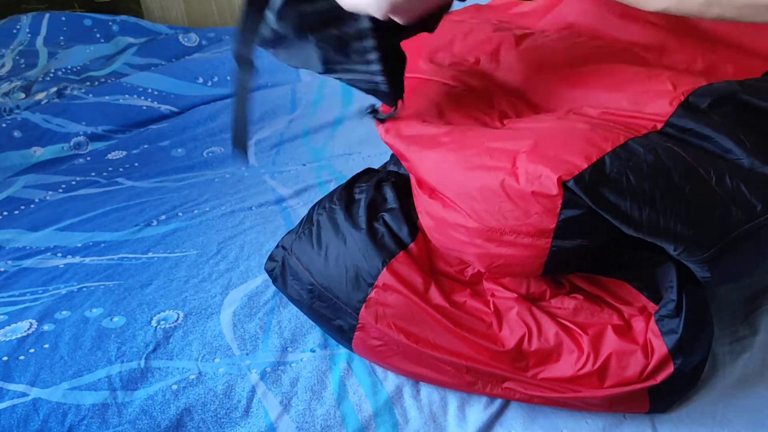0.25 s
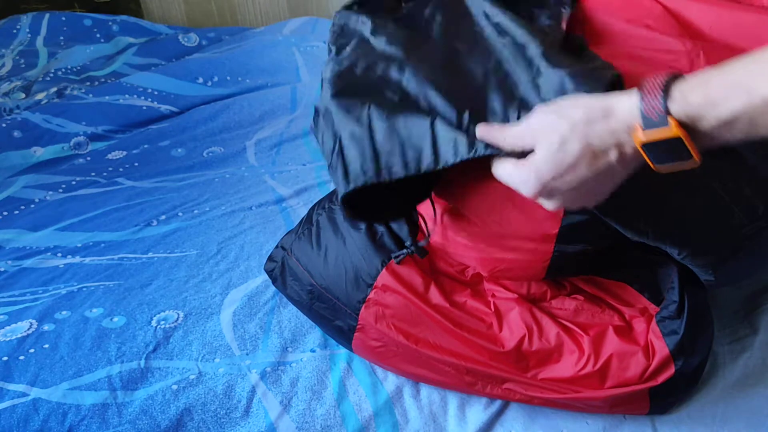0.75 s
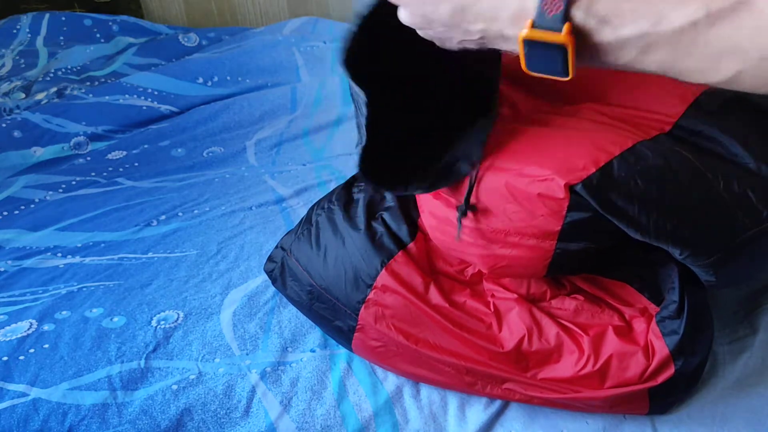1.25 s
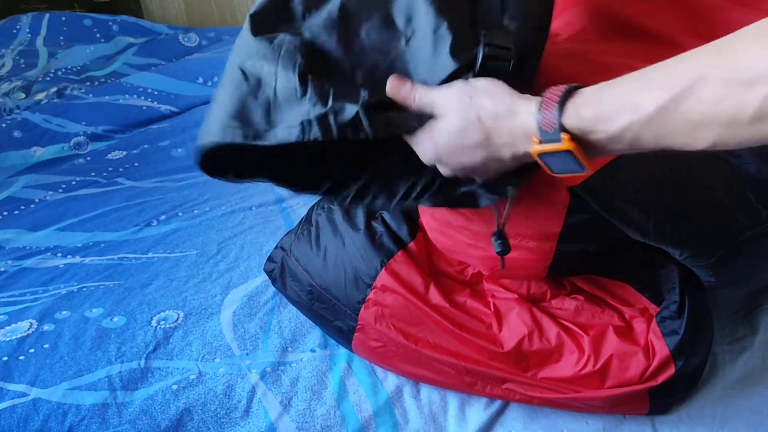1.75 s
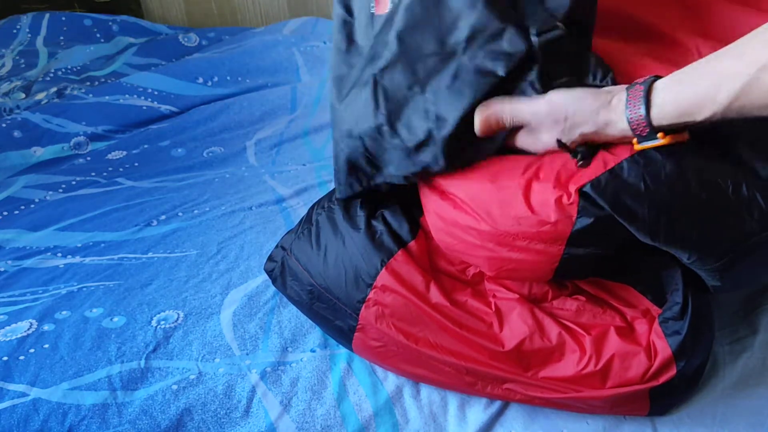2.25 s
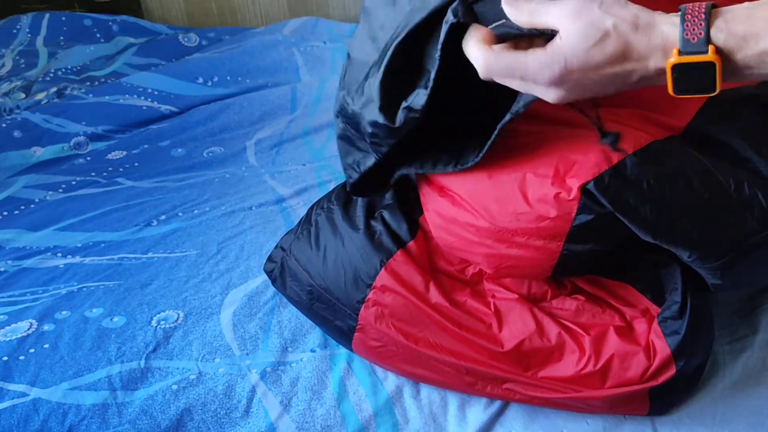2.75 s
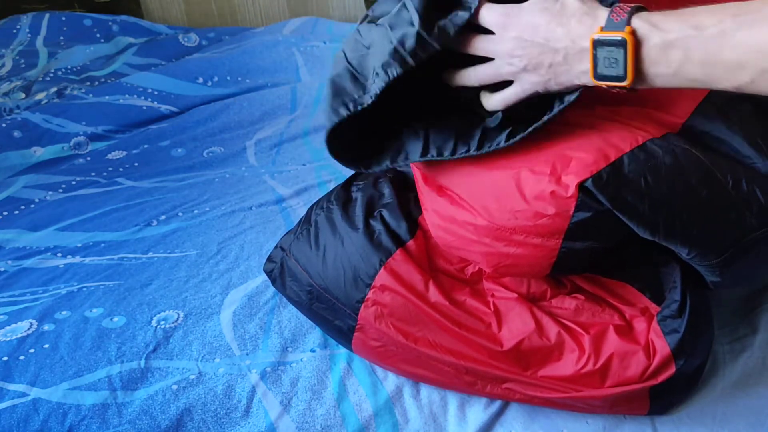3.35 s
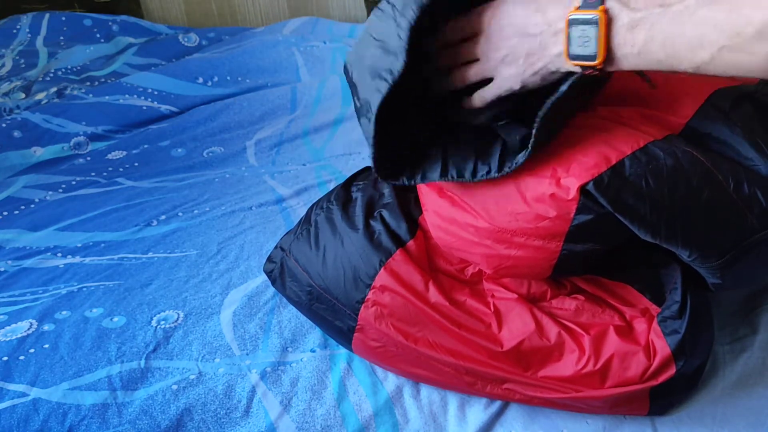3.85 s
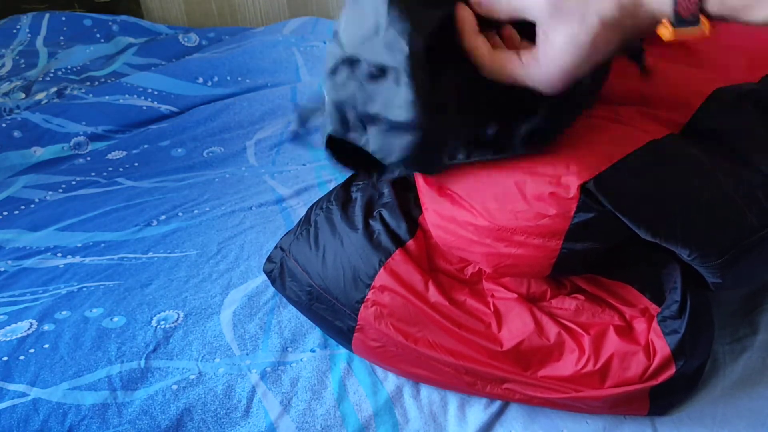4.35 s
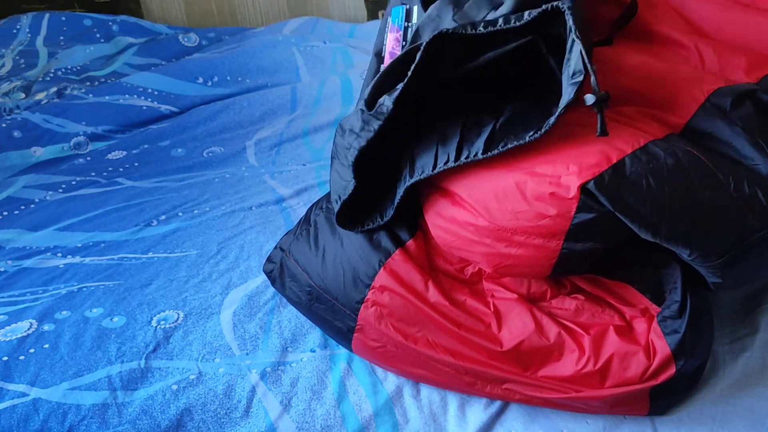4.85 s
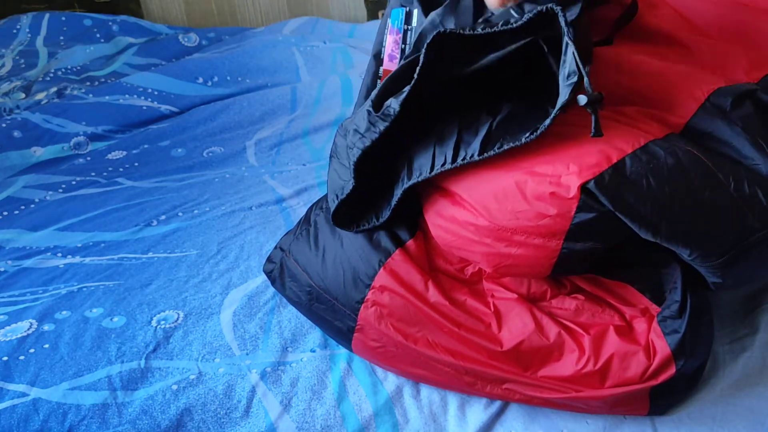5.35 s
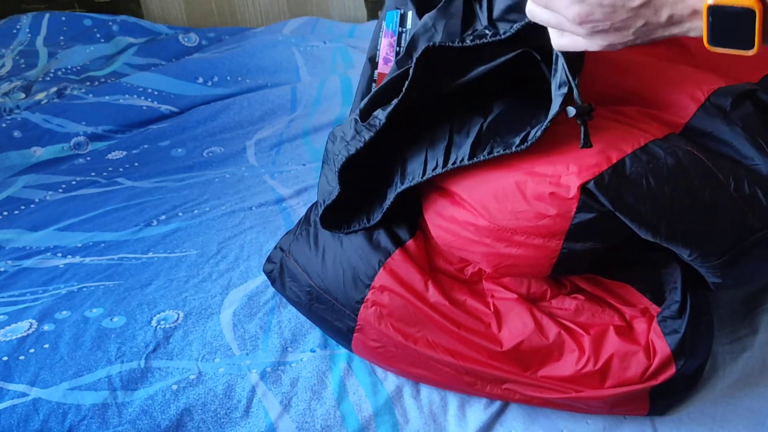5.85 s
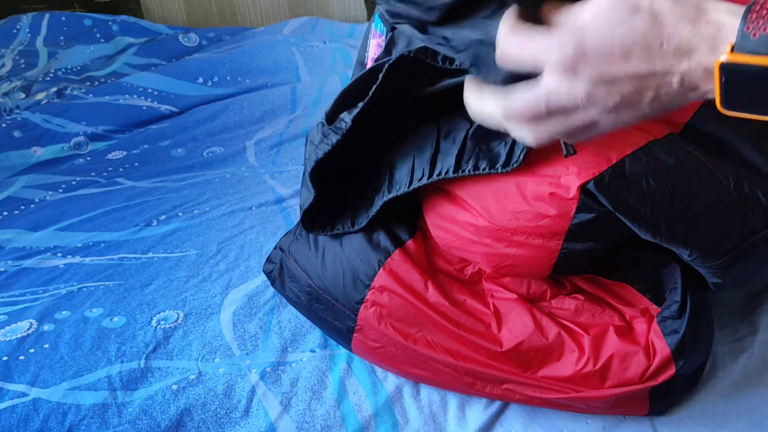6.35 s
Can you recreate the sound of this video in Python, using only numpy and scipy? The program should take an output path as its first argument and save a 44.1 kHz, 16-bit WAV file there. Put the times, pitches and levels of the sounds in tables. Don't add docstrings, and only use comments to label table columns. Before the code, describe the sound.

Slick nylon fabric rustles and crinkles close up in uneven strokes as hands handle a stuff sack, with one sharp little tick and a late pop.

```python
import sys
import numpy as np
from scipy import signal
from scipy.fft import rfft, irfft
from scipy.io import wavfile
from scipy.ndimage import uniform_filter1d

SR = 44100
rng = np.random.default_rng(int(sys.argv[2]) if len(sys.argv) > 2 else 0)


def makeup_ratio(level_db):
    decades = np.asarray(level_db, float) / 20
    return 10 ** decades


def master_out(mix):
    frames = np.transpose(np.atleast_2d(mix))
    ceiling = np.clip(frames, -1, 1)
    pcm = np.round(ceiling * 32767).astype(np.int16)
    wavfile.write(sys.argv[1], SR, pcm)


N = 291060
HZ = np.fft.rfftfreq(N, 1 / SR)


def evened(x):
    return x / np.sqrt(np.mean(x ** 2) + 1e-20)


def read(points, hz):
    f, value = np.transpose(points)
    return np.interp(np.log(hz + 1), np.log(f + 1), value)


def filtered(x, tone):
    return irfft(rfft(x) * makeup_ratio(read(tone, HZ)), N)


def curve(rows):
    s, value = np.transpose(rows)
    return np.interp(np.arange(N) / SR, s, value)


def sides(db):
    return makeup_ratio(np.array([db / 2, -db / 2]))


def add(mix, s, sound):
    part = mix[:, round(s * SR):][:, :sound.shape[1]]
    part += sound[:, :part.shape[1]]


# (frequency [Hz], left-right likeness [0-1])
COHERENCE = [(40, 0.11), (80, 0.26), (150, 0.91), (300, 0.89), (640, 0.75), (1000, 0.47), (1500, 0.61),
             (3100, 0.4), (6000, 0.16), (9000, 0.025), (15000, 0.058)]


def pair(x):
    same = np.clip(read(COHERENCE, HZ), 0, 1)
    a, b = rfft(x)
    return irfft([a, same * a + np.sqrt(1 - same ** 2) * b], N)


def rustle(tone, per_s, spread_db, slip_s, hiss):
    rank = np.minimum(rng.exponential(1, N), 3.5)
    happens = rng.random(N) < per_s / SR
    size = makeup_ratio(spread_db * rank) * happens
    decay = np.exp(-1 / (slip_s * SR))
    slips = signal.lfilter([1], [1, -decay], size ** 2)
    power = slips / slips.mean() + hiss
    return evened(filtered(np.sqrt(power) * rng.standard_normal((2, N)), tone))


def swell(s, db, rise_ms, fall_ms):
    t = np.arange(0, N + 64, 64) / SR
    late_ms = 1000 * (t - s[:, None])
    steps = np.where(late_ms < 0, -late_ms / rise_ms[:, None], late_ms / fall_ms[:, None])
    power = (makeup_ratio(db[:, None] - 10 * steps) ** 2).sum(0)
    return np.interp(np.arange(N) / SR, t, power)


# (peak time [s], effort [dB], rise [ms], fall [ms], weight on the filling [dB])
TURNING_STROKES = [(-0.009, -34, 498, 31, -9), (0.074, -34, 150, 64, -9), (0.2, -54, 23, 20, -1),
                   (0.266, -38.5, 210, 31, -16), (0.477, -38, 150, 110, -14), (0.597, -40.5, 39, 79, -30),
                   (0.684, -41, 220, 22, -10), (0.77, -36, 27, 33, -20), (0.827, -32.5, 77, 49, -11.5),
                   (0.887, -27.5, 146, 40, -16), (1.028, -36, 110, 400, -18.0), (1.097, -50, 39, 23, -14),
                   (1.182, -37, 50, 78, -3.5), (1.346, -46.5, 27, 34, -8), (1.438, -39.5, 108, 460, -16.5),
                   (1.533, -42, 38, 38, -20), (1.755, -30, 29, 9.3, -8.5), (1.819, -24.5, 90, 94, -11.5),
                   (1.995, -41.5, 72, 42, -13), (2.214, -38, 260, 59, -11.5)]
OPENING_STROKES = [(2.401, -45.5, 211, 8.8, -11.5), (2.534, -38.5, 128, 56, -9),
                   (2.638, -37.5, 12, 40, -16.5), (2.752, -44, 92, 93, -10), (2.884, -38.5, 31, 95, -17),
                   (2.945, -40.5, 170, 18, -10.5), (3.049, -36, 39, 45, -27), (3.164, -43, 280, 20.4, -18),
                   (3.257, -32, 72, 25, -22.5), (3.346, -34, 35, 29, -20.5), (3.45, -31, 73, 91, -23),
                   (3.544, -37.5, 190, 14, -14), (3.592, -37, 343, 25, -13), (3.701, -28.5, 55, 40, -15.5),
                   (3.845, -33.5, 85, 123, -16), (3.99, -32, 37, 56, -22), (4.054, -37, 110, 56, -7),
                   (4.167, -29, 46, 24, -21), (4.302, -31, 240, 42, -18), (4.422, -35, 21, 33, -21),
                   (4.456, -38, 310, 38, -17)]
SETTLING_STROKES = [(4.544, -39, 9.4, 92, -19.5), (4.686, -40.5, 79, 52, -9.5), (4.774, -42, 5.1, 92, -13),
                    (4.884, -38, 38, 44, -14), (4.962, -38.5, 9.3, 94, -15), (5.061, -45, 39, 54, -7),
                    (5.102, -28.5, 8.7, 46, -23), (5.272, -43.5, 37, 117, -15.5),
                    (5.333, -42.5, 29, 34, -12), (5.437, -38, 43, 120, -15.5), (5.521, -41, 61, 25, -8),
                    (5.591, -43, 16, 330, -11.5), (5.792, -45.5, 78, 23, -23), (5.878, -45, 250, 120, -11),
                    (6.003, -36.5, 26, 50, -16), (6.074, -29.5, 53, 27, -6.5), (6.243, -44, 130, 96, -16),
                    (6.545, -42, 210, 86, -17.5)]


def strokes(weight_share, layer_db):
    rows = TURNING_STROKES + OPENING_STROKES + SETTLING_STROKES
    s, db, rise_ms, fall_ms, weight_db = np.transpose(rows)
    effort_db = db + weight_share * weight_db + layer_db
    return swell(s, effort_db, np.maximum(rise_ms, 4), np.maximum(fall_ms, 4))


# (time [s], effort [dB], rise and fall [ms])
SQUEEZES = [(0.218, -51.5, 26), (0.482, -47.5, 76), (0.675, -45, 33), (0.789, -42, 29), (1.032, -49.5, 33),
            (1.229, -42, 8.9), (1.438, -43.5, 23), (1.58, -46, 63), (1.656, -44.5, 61), (1.737, -42.5, 42),
            (1.871, -45, 32), (2.244, -50.5, 54), (3.106, -51.5, 43), (3.272, -50.5, 25), (3.365, -61, 33),
            (4.015, -54, 26), (4.294, -49, 19), (4.382, -50, 55), (5.114, -52, 17), (5.275, -55, 14),
            (5.604, -57, 20), (6.283, -60, 40), (6.576, -55, 30)]


def squeezes():
    s, db, length_ms = np.transpose(SQUEEZES)
    return swell(s, db, length_ms, length_ms)


# (frequency [Hz], level [dB])
SLIDE_SPECTRUM = [(1500, -13.5), (3000, -4), (4500, -3), (7000, -2.5), (11000, -2.5), (16000, -5.5)]
# (time [s], left-right difference [dB])
HAND_PLACE = [(0, 1.5), (1.9, 2), (2.3, 2.5), (4.4, 1.5), (5.0, 3), (5.4, 1), (6.2, 1), (6.5, 8.5),
              (6.6, 11)]


def sliding():
    hiss = rustle(SLIDE_SPECTRUM, per_s=590, spread_db=4.0, slip_s=0.013, hiss=0.46)
    power = strokes(weight_share=0, layer_db=-8)
    return pair(hiss * np.sqrt(power)) * sides(curve(HAND_PLACE))


# (frequency [Hz], level [dB])
CRUMPLE_SPECTRUM = [(300, -23), (700, -4), (1100, -2), (1600, -0.5), (2800, -2), (4000, -8.5), (8000, -20),
                    (16000, -40)]
# (time [s], effort [dB], rise and fall [ms])
LONE_FOLDS = [
    (0.68, -52, 25),
    (3.22, -52, 40),
    (3.98, -49, 33),
    (5.0, -50, 15),
    (5.33, -43, 11),
    (5.445, -45, 69),
    (6.27, -54, 25),
]


def crumpling():
    crackle = rustle(CRUMPLE_SPECTRUM, per_s=270, spread_db=3.5, slip_s=0.0033, hiss=1.18)
    s, db, length_ms = np.transpose(LONE_FOLDS)
    power = strokes(weight_share=0.64, layer_db=-0.36) + swell(s, db, length_ms, length_ms)
    power = power + squeezes() * makeup_ratio(-3) ** 2 + makeup_ratio(-74) ** 2
    return pair(crackle * np.sqrt(power))


# (frequency [Hz], level [dB])
PUSH_SPECTRUM = [(60, -44), (105, -14), (150, -6), (215, 2), (330, -3), (520, -2.5), (800, -5.5),
                 (1300, -8), (3000, -56)]


def pushing():
    low = rustle(PUSH_SPECTRUM, per_s=60, spread_db=1.5, slip_s=0.0023, hiss=2.8)
    power = strokes(weight_share=1, layer_db=-1.5)
    power = power + squeezes() * makeup_ratio(1.5) ** 2 + makeup_ratio(-63) ** 2
    return pair(low * np.sqrt(power))


# (time [s], level [dB])
AIR_LEVEL = [(0.0, -61), (0.26, -65), (0.27, -66), (0.79, -59), (0.97, -68), (1.01, -61), (1.62, -60),
             (1.78, -58), (1.91, -62), (5.53, -63), (5.59, -67), (5.7, -64), (5.84, -67), (6.07, -64),
             (6.23, -67), (6.43, -56), (6.56, -58), (6.6, -63)]
# (frequency [Hz], level [dB])
AIR_SPECTRUM = [(14, -3), (28, 1.5), (40, -5.5), (65, -8.5), (100, -12.5), (200, -26), (500, -57)]


def air():
    lumps = rustle(AIR_SPECTRUM, per_s=42, spread_db=-17.0, slip_s=0.058, hiss=2.7)
    return pair(lumps) * makeup_ratio(curve(AIR_LEVEL) + 1.8)


def modes(events):
    out, t = np.zeros((2, N)), np.arange(3000) / SR
    onset = 1 - np.exp(-t / 0.00032)
    for s, db, hz, t60 in events:
        decay = makeup_ratio(db - 60 * t / max(t60, 0.002))
        ring = decay * np.sin(2 * np.pi * hz * t) * onset
        add(out, s + 0.00029, np.array([ring, 0.74 * ring]))
    return out


def brief(events):
    return modes([(s + 0.0008, db, hz, 14.3 / hz) for s, db, hz in events])


# (time [s], peak [dB], pitch [Hz])
FOLD_CRACKS = [(0.031, -18.5, 1460), (0.407, -32.5, 890), (0.763, -28, 961), (0.783, -24.5, 1350),
               (0.826, -22, 1580), (1.027, -34.5, 846), (1.175, -22, 1910), (1.183, -21, 1430),
               (1.336, -30.5, 1140), (1.434, -38, 1480), (1.563, -32, 1130), (1.736, -19.5, 1300),
               (2.136, -33, 1510), (2.439, -35, 1500), (2.929, -26, 3430), (3.328, -25, 3570),
               (3.408, -25.5, 2260), (3.678, -20, 3080), (4.142, -21, 3130), (4.444, -31, 1600),
               (4.95, -31, 2160), (4.864, -37, 2170), (4.981, -41, 970), (5.0, -26, 2600),
               (5.846, -36, 1440), (4.021, -25, 1900), (3.265, -33, 3400), (3.444, -24, 2400),
               (6.546, -39, 1480), (5.267, -43, 754), (5.7, -38, 1690), (5.927, -37.5, 700)]


def cracks():
    return brief(FOLD_CRACKS)


# (time [s], peak [dB], left-right difference [dB], flurry length [s])
CREASE_SNAPS = [(0.059, -35, 1, 0.0031), (0.4553, -37, 0, 0.003), (0.7555, -26.5, 4, 0.0065),
                (1.1495, -26, -3, 0.0019), (1.353, -36, 4.5, 0.0025), (1.716, -29, 17, 0.0028),
                (1.79, -28, 2, 0.002), (1.8103, -22, 7, 0.0026), (1.829, -28, 2, 0.0035),
                (2.929, -38, -3, 0.003), (3.028, -41, 6, 0.0039), (3.3263, -36, 0, 0.003),
                (3.568, -29.5, 7, 0.0036), (3.953, -28, -2, 0.008), (3.974, -29, 23, 0.0028),
                (3.983, -18.5, 1.5, 0.007), (4.4117, -30, 1, 0.0041), (4.453, -35, 3, 0.0034),
                (4.536, -35, 7, 0.003), (4.544, -43, 2, .003), (4.772, -31, -3, 0.0018),
                (4.776, -36, 5, 0.0017), (4.9519, -28, 9, 0.0008), (5.0964, -15, -1, 0.00046),
                (5.1038, -28, -7, 0.0018), (5.186, -29, -1.5, 0.0014), (5.3238, -30.5, 3, 0.0012),
                (5.5915, -29, 1, 0.0042), (5.701, -33, 3, 0.0035), (6.0526, -29, 2, 0.0025),
                (6.0665, -28, -3, 0.0021), (6.542, -35, 1, 0.0024)]
# (frequency [Hz], level [dB])
SNAP_SPECTRUM = [(700, -30), (2000, -9), (3500, -10), (5500, 1.5), (7000, 0), (11000, -6), (16000, -10)]


def snaps():
    out, t = np.zeros((2, N)), np.arange(1500) / SR
    noise = rng.standard_normal((len(CREASE_SNAPS), 2, 1500))
    for (s, db, pan_db, flurry_s), puff in zip(CREASE_SNAPS, noise):
        flurry = 0.62 * puff * np.exp(-t / max(flurry_s, 2e-4))
        tick = flurry + (t == t[20])
        add(out, s + 0.0011, makeup_ratio(db - 5.0) * sides(pan_db)[:, None] * tick)
    return filtered(pair(out) + out, SNAP_SPECTRUM)


# (time [s], peak [dB], pitch [Hz], t60 [s])
PANEL_POPS = [(0.064, -23.5, 790, 0.0087), (0.479, -31.5, 299, 0.012), (0.669, -28, 1470, 0.01),
              (0.799, -28, 1480, 0.012), (1.15, -27.5, 1630, 0.012), (1.189, -28, 384, 0.016),
              (1.223, -34, 248, 0.032), (1.446, -35, 1510, 0.016), (1.757, -23.5, 533, 0.017),
              (1.791, -18.5, 2710, 0.012), (1.857, -26, 1310, 0.013), (2.239, -44, 269, 0.011),
              (3.104, -27.5, 503, 0.0074), (3.236, -39, 940, .04), (3.355, -36.5, 764, 0.049),
              (3.424, -37, 850, .03), (3.698, -29, 2060, 0.015), (3.923, -29, 990, 0.0093),
              (4.279, -37, 680, 0.017), (5.098, -34, 824, 0.029), (5.325, -30, 2300, 0.0096),
              (5.427, -32, 1520, 0.017), (5.597, -24.5, 1740, 0.0066), (5.975, -30, 780, 0.015),
              (6.03, -17, 2540, 0.0062), (6.032, -19.5, 725, 0.013), (6.04, -20.5, 735, 0.017),
              (6.054, -30, 1590, 0.012), (6.059, -3.5, 1540, 0.0051), (6.062, -23.5, 470, 0.028),
              (6.068, -26, 1020, 0.011), (6.259, -33.5, 784, 0.011), (6.566, -35, 414, 0.011)]


def pops():
    return modes(PANEL_POPS)


# (time [s], effort [dB], rise [ms], fall [ms])
TAUT_SWISHES = [
    (0.46, -50, 15, 45),
    (0.6, -47, 28, 50),
    (0.86, -38, 25, 24),
    (3.989, -36.5, 16, 17),
    (6.04, -48, 6, 20),
    (4.55, -56, 8, 25),
    (5.107, -50, 4, 8),
]
# (frequency [Hz], level [dB])
SWISH_SPECTRUM = [(3000, -32), (5000, -15), (6500, -1), (9000, 4), (12000, 4), (16000, -10)]


def swishes():
    fizz = rustle(SWISH_SPECTRUM, per_s=500, spread_db=9.0, slip_s=0.0022, hiss=0.6)
    return pair(fizz * np.sqrt(swell(*np.transpose(TAUT_SWISHES))))


# (time [s], peak [dB], pitch [Hz])
HAND_THUDS = [
    (0.653, -46, 138),
    (1.02, -44, 186),
    (1.173, -43.5, 162),
    (1.57, -44, 166),
    (1.711, -39, 228),
    (3.7, -43, 186),
    (4.377, -41, 225),
    (6.038, -48, 235),
]


def thuds():
    return brief(HAND_THUDS)


# (time [s], peak [dB], pitch [Hz], t60 [s])
LOCK_MODES = [(5.0972, -12.5, 6730, 0.0039), (5.0973, -19, 8940, 0.0027), (5.0974, -23, 3680, 0.0053),
              (5.0972, -12, 14660, .0025), (5.0972, -24, 15600, .003), (5.1037, -29, 7300, .004),
              (5.1062, -27, 7600, .004), (5.108, -30, 7000, 0.0035), (5.0967, -12.5, 5000, 0.0023),
              (5.0971, -8, 10600, 0.0037), (5.097, -35, 2300, 0.003)]


def cord_lock():
    return modes(LOCK_MODES)


# (frequency [Hz], t60 [s])
REVERBERATION = [(200, 0.16), (1000, 0.1), (4000, 0.14), (10000, 0.092)]


def room(x):
    taps = np.zeros((2, SR // 2))
    start = np.arange(120, SR // 2 - 20, 20)
    at = start + rng.integers(0, 20, (2, len(start)))
    np.put_along_axis(taps, at, rng.choice([-1., 1.], at.shape), 1)
    hz, t, z = signal.stft(taps, SR, nperseg=256)
    decay = makeup_ratio(-60 * t / read(REVERBERATION, hz)[:, None])
    tail = signal.istft(z * decay, SR, nperseg=256)[1]
    return signal.fftconvolve(x, tail / np.linalg.norm(tail[0]), axes=1)[:, :N]


def scene():
    soft = sliding() + crumpling() + pushing() + swishes()
    hits = cracks() + snaps() + pops() + thuds() + cord_lock()
    tail = pair(room(makeup_ratio(-5.0) * hits + makeup_ratio(-10.5) * soft))
    return soft + hits + tail + air()


# (frequency [Hz], limit relative to the neighbourhood [dB])
BAND_LIMIT = [(1500, -12), (3200, -1.3), (6400, -.9), (7000, -12), (9200, -12), (9600, -3.5), (10600, -.8),
              (16000, -.3)]


def thinned(x):
    mid_side = [x[0] + x[1], x[0] - x[1]]
    hz, _, z = signal.stft(mid_side, SR, nperseg=2048, noverlap=1536)
    power = uniform_filter1d(abs(z) ** 2, size=2, axis=2)
    band = np.add.reduceat(power, np.arange(0, len(hz), 12), axis=1) / 12
    band = np.repeat(band, 12, axis=1)[:, :len(hz)]
    around = uniform_filter1d(power, size=61, axis=1)
    frame = power.sum((0, 1))
    sudden = frame > uniform_filter1d(frame, size=25) * makeup_ratio(5) ** 2
    kept = (band > around * makeup_ratio(read(BAND_LIMIT, hz))[:, None] ** 2) | sudden
    mid, side = signal.istft(z * kept, SR, nperseg=2048, noverlap=1536)[1][:, :N]
    return np.array([mid + side, mid - side]) / 2


def low_pass(x):
    return signal.sosfilt(signal.butter(12, 15800, fs=SR, output="sos"), x)


# (resonance [Hz], sharpness Q)
PORT_CAVITIES = [(8414, 8.1), (7770, 8.8)]
# (frequency [Hz], left-right difference [dB])
BALANCE = [(60, 3), (250, 6.5), (800, 3), (1800, 1.5), (4000, -1), (10000, -3.5), (15000, -4)]
# (frequency [Hz], level [dB])
TREBLE = [(6000, 0.5), (8700, -1), (9400, -4.5), (10200, -9), (12000, -6.5), (15700, 0.5)]


def record(dry):
    cavity = np.array([1 / (1 - (HZ / hz) ** 2 + 1j * HZ / (hz * q)) for hz, q in PORT_CAVITIES])
    colour = cavity * makeup_ratio(read(TREBLE, HZ)) * sides(read(BALANCE, HZ))
    mix = thinned(irfft(rfft(dry) * colour, N))
    return low_pass(mix)


dry = scene()
out = record(dry)
master_out(out)
```